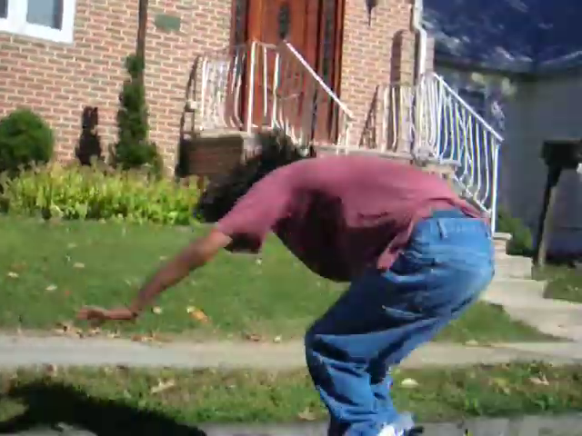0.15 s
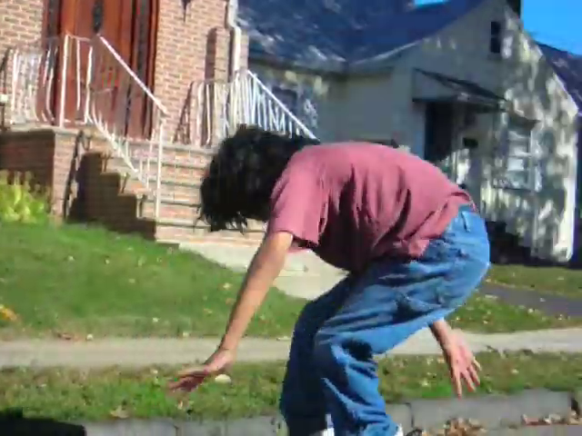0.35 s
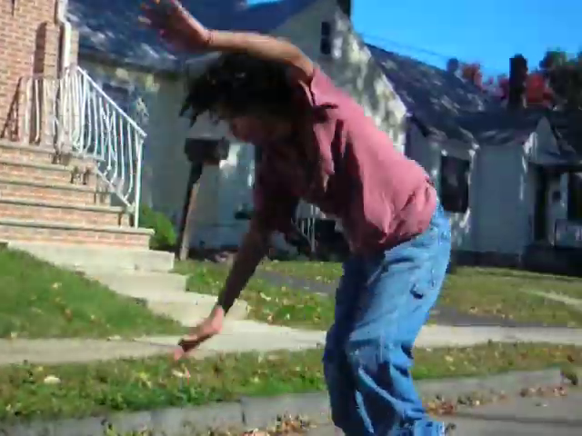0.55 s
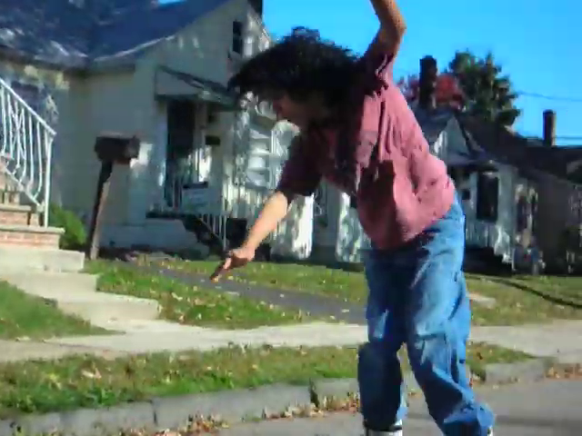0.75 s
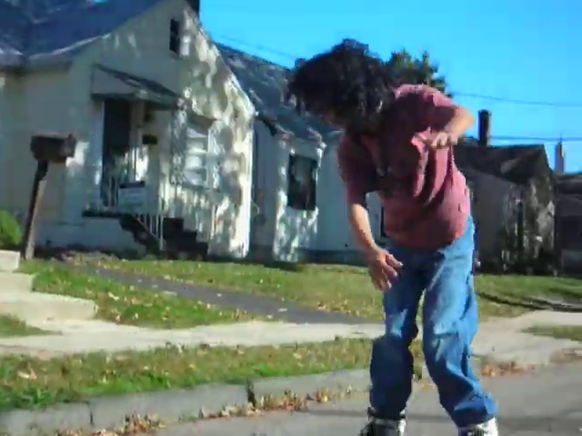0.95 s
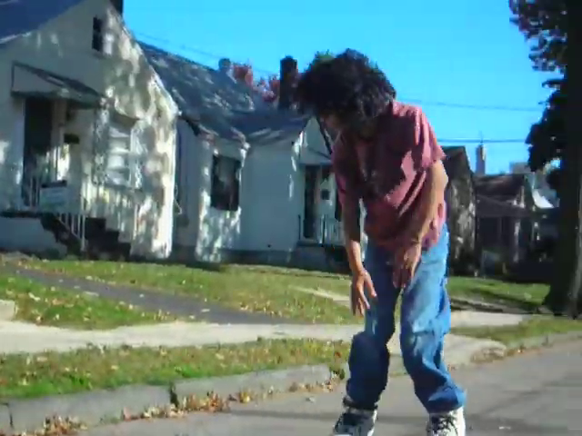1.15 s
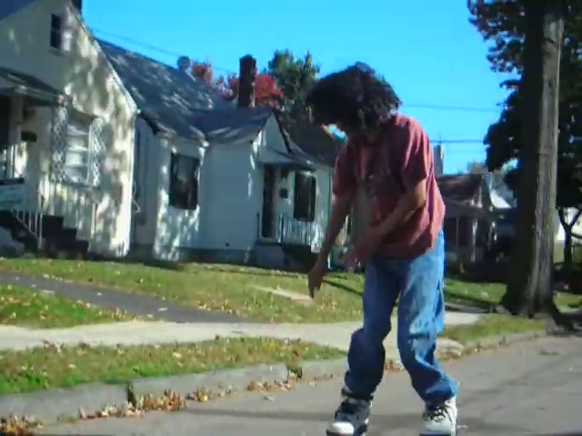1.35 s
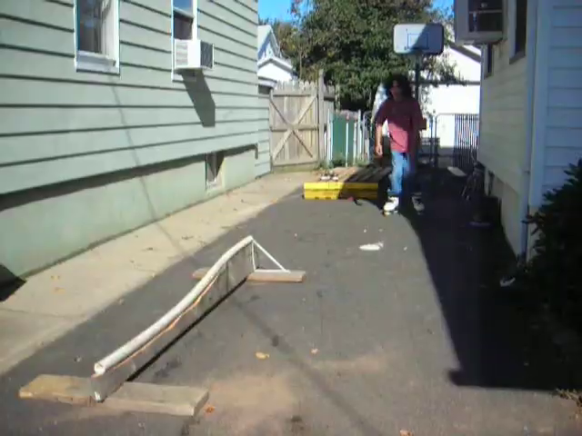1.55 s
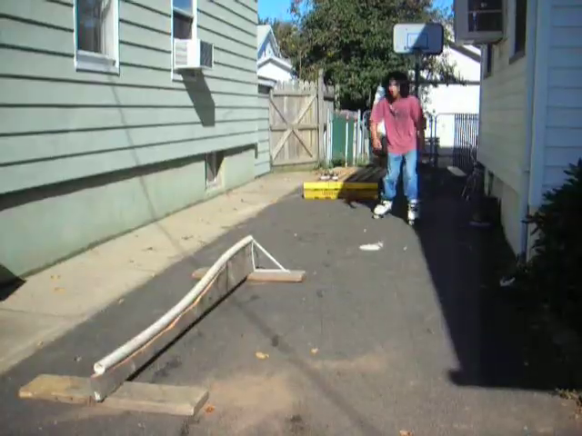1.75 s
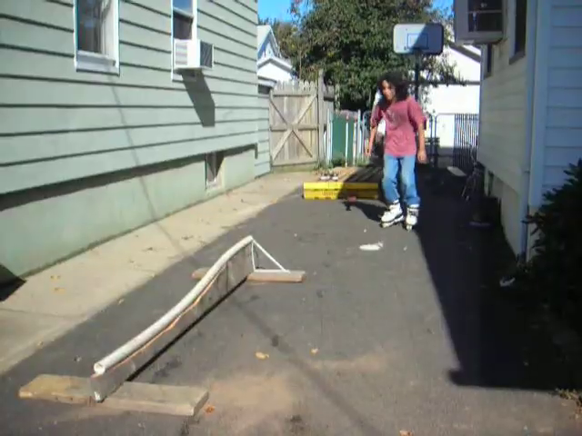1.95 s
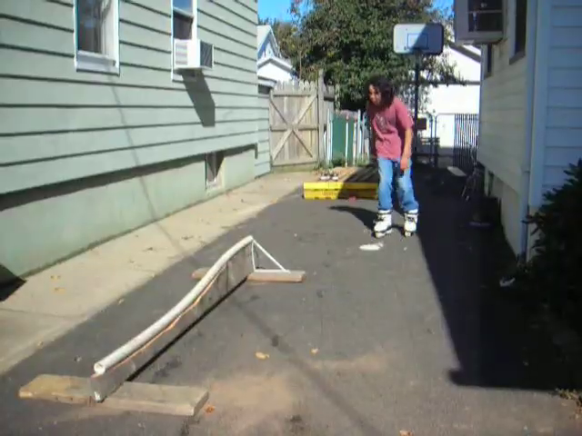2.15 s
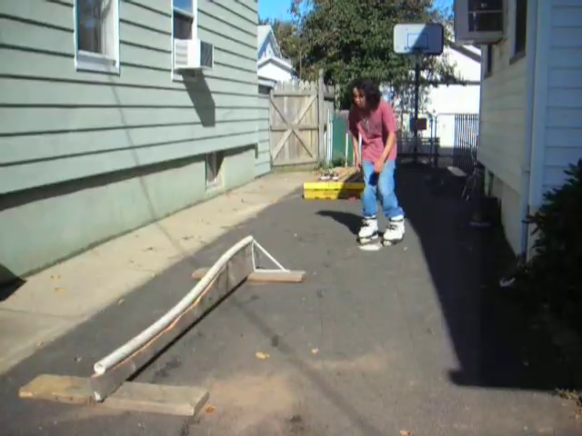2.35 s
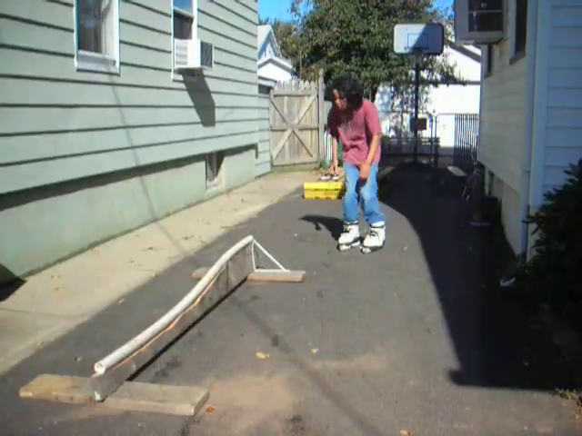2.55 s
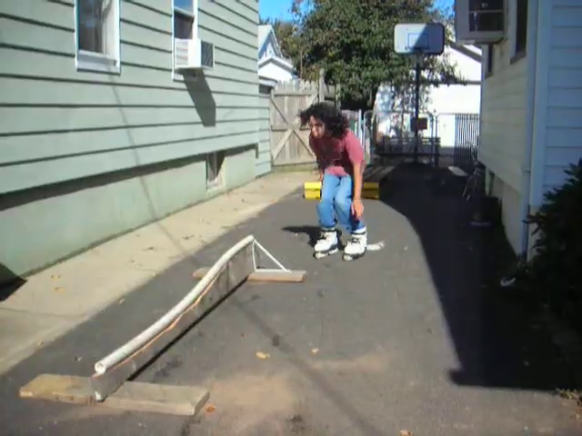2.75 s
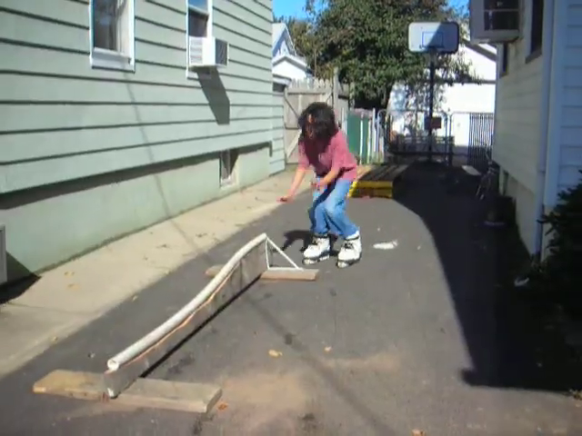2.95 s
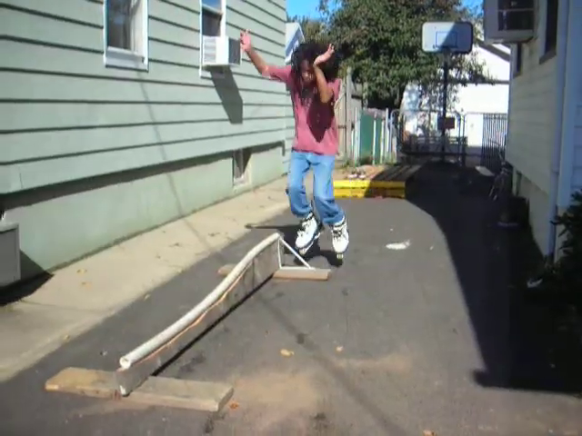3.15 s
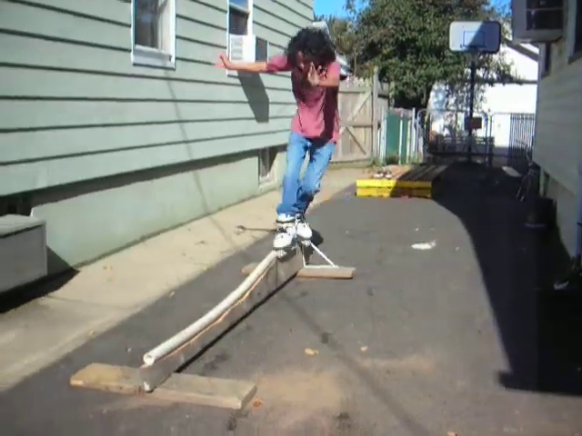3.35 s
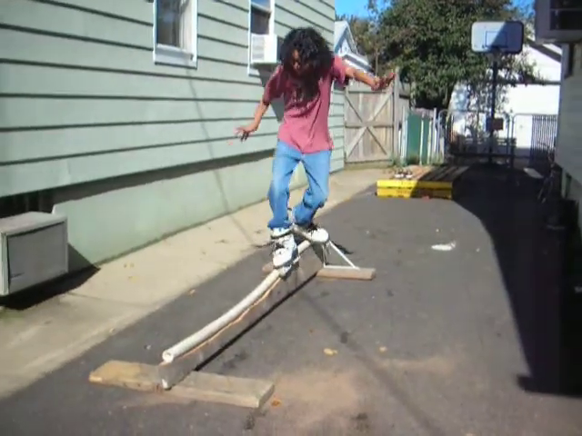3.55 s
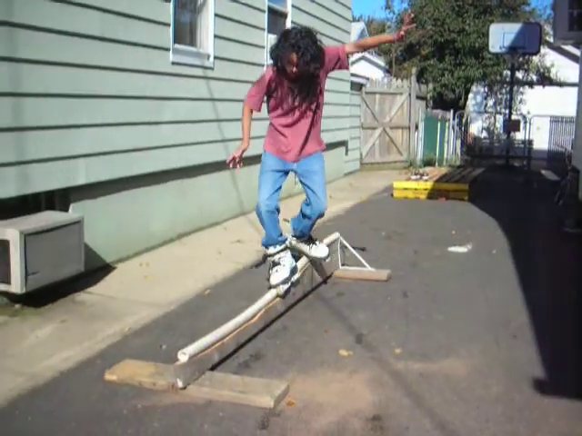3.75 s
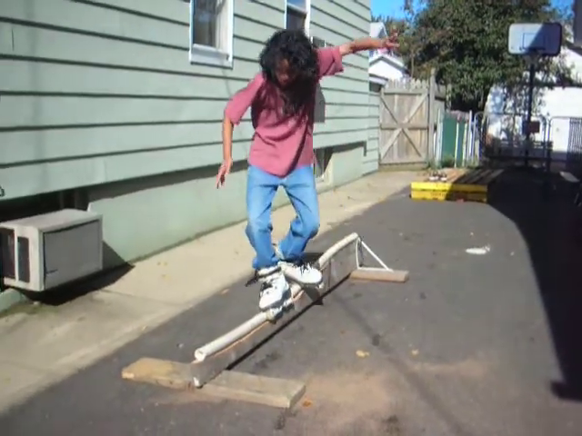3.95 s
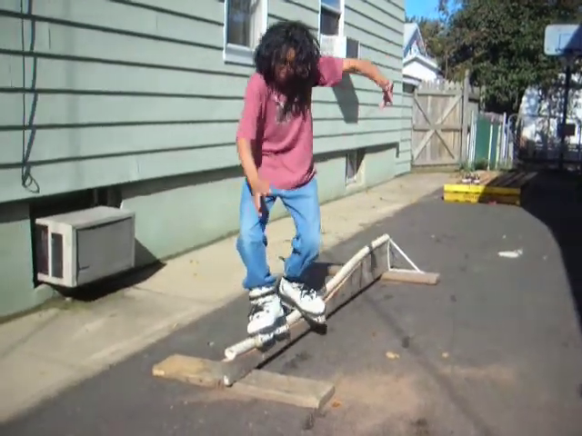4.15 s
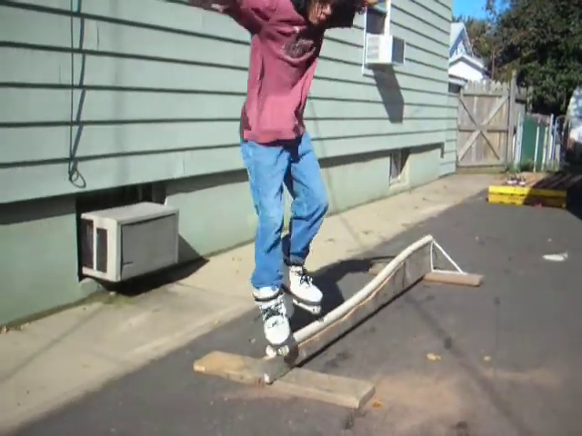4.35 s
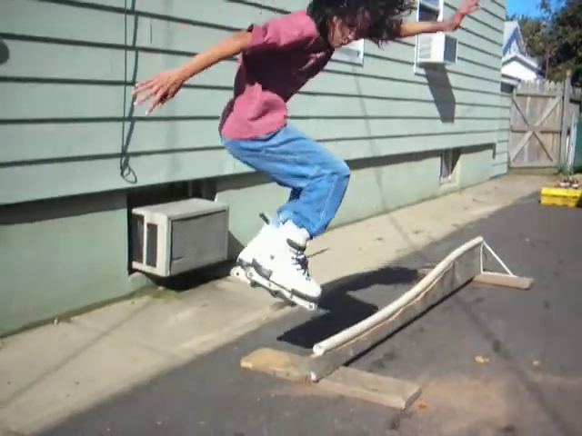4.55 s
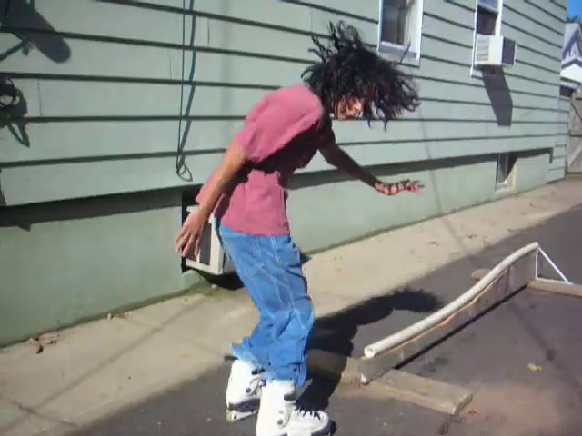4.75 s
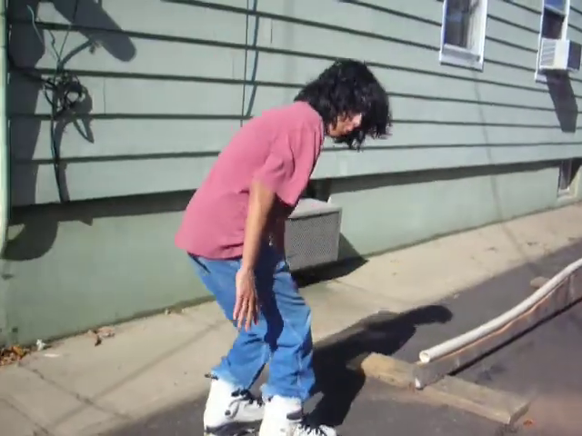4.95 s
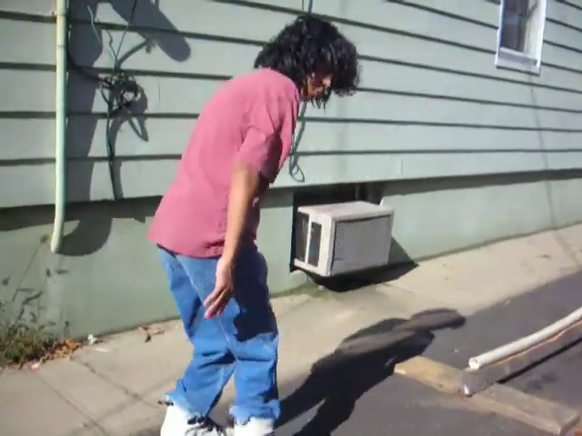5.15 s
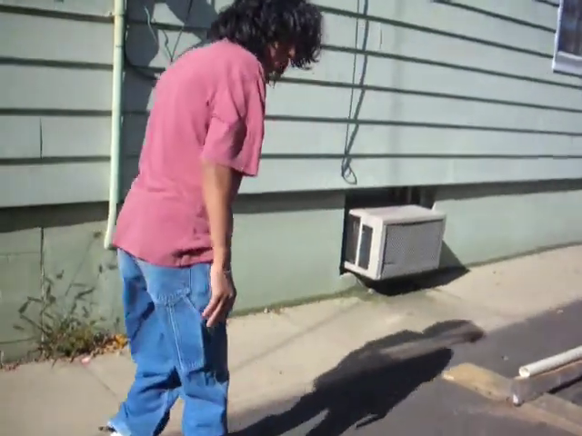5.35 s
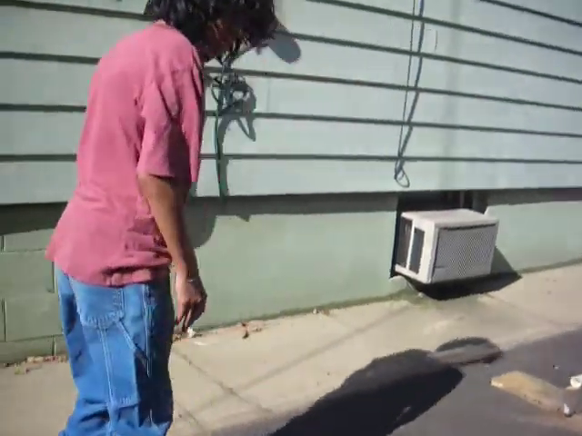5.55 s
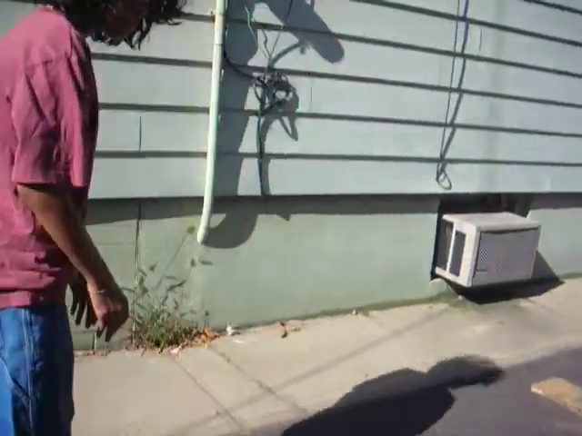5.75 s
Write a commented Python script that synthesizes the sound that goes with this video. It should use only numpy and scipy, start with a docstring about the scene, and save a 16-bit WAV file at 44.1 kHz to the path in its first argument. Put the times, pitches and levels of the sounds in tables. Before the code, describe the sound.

An inline skater lands a jump with a sharp clack and rolls along a street, hard wheels rasping on grit. The rolling continues up a driveway between two houses. The skates clatter onto a low rail, plastic soles scrape along it with a few ringing knocks, then slap down and roll loudly near the microphone. The walls add a short echo over a faint neighbourhood hush, and the sound is dull on top.

```python
"""First comes a sharp clack: an inline skater lands a jump and rolls off along a street. The skater
runs up a driveway between two houses, hops onto a low rail, slides down it, lands and rolls close by.
Grit in the asphalt rattles the wheels and boots, plastic soles scrape the rail and make it ring, and
the house walls add a short echo. A faint neighbourhood hush lies underneath. The sound is cut off
above about 4 kHz and clips on the hardest clacks."""
import sys
import numpy as np
from scipy import signal
from scipy.fft import rfft, irfft
from scipy.io import wavfile
from scipy.ndimage import uniform_filter1d

SR = 44100
rng = np.random.default_rng(int(sys.argv[2]) if len(sys.argv) > 2 else 0)


def master_out(mix):
    """Clip the mix to full scale and print it as 16-bit PCM to the path in sys.argv[1]."""
    frames = np.transpose(np.atleast_2d(mix))
    ceiling = np.clip(frames, -1, 1)
    pcm = np.round(ceiling * 32767).astype(np.int16)
    wavfile.write(sys.argv[1], SR, pcm)


N = 259749
TIME = np.arange(N) / SR
HIT_SIZE = 8192  # samples in one short sound or filter

# How loud each stretch is, set by speed, weight on the skates and distance.
# Each row: time in seconds, level in dB.
STREET_LEVELS = [(0.02, -41.5), (0.12, -29), (0.175, -37.5), (0.33, -35.5), (0.38, -30), (0.46, -28.5),
                 (0.54, -17), (0.74, -18), (1.07, -18.5)]
COAST_LEVELS = [(1.09, -32.5), (1.18, -33), (1.23, -27), (1.45, -21.5), (1.56, -28.5), (1.74, -28.5)]
RUN_UP_LEVELS = [(1.75, -21), (2.0, -30.5), (2.11, -28.5), (2.13, -21.5), (2.65, -22.5), (2.87, -20),
                 (3.07, -26), (3.16, -37.5), (3.3, -39.5)]
SLIDE_LEVELS = [(3.40, -25.5), (3.54, -39), (3.73, -41.5), (3.92, -34.5), (4.08, -27), (4.28, -30),
                (4.34, -22), (4.52, -35.5), (4.66, -48.5)]
ROLL_OUT_LEVELS = [(4.78, -26.5), (4.84, -40.5), (4.92, -40), (5.192, -29.5), (5.204, -23.5), (5.32, -23.5),
                   (5.52, -16), (5.64, -18), (5.85, -14.5)]
# The tone of each stretch and of the background air. Each row: frequency in Hz, gain in dB.
STREET_TONE = [(29, -59.5), (50, -35.5), (198, -3.5), (338, -5.5), (371, -3.5), (705, -8), (895, -8.5),
               (1020, -3.5), (1320, -4), (1640, -2), (3240, -5.5), (4040, -23.5), (5250, -57), (8890, -120)]
COAST_TONE = [(29, -53), (50, -26), (70, -24.5), (184, -12), (406, -10.5), (879, -16.5), (1200, -11),
              (1420, -17.5), (1670, -6), (1900, -12), (2900, -14.5), (3240, -11), (4040, -35.5),
              (5250, -57), (8890, -120)]
RUN_UP_TONE = [(29, -69.5), (50, -31), (188, 1), (238, -9), (326, 0.5), (399, -12), (555, -4.5),
               (929, -7.5), (1160, -2), (1470, -5.5), (1700, -1.5), (1940, -2.5), (2290, -3), (3300, -8.5),
               (4040, -24), (5250, -51.5), (8890, -120)]
SLIDE_TONE = [(29, -84), (50, -31), (135, -19), (178, -21), (257, -13), (371, -11.5), (462, -23),
              (488, -15.5), (802, -0.5), (1080, -8.5), (1220, -5.5), (2700, -7.5), (4040, -21),
              (5250, -83.5), (8890, -120)]
ROLL_OUT_TONE = [(29, -59.5), (50, -36), (108, -12.5), (222, -2), (257, -4.5), (344, 0.5), (406, -8.5),
                 (525, -13), (787, -2), (1120, -4.5), (1290, -2), (1700, -2), (3240, -6.5), (4040, -21.5),
                 (5250, -65), (8890, -120)]
AIR_TONE = [(24, -31.5), (40, -16.5), (70, -33), (322, -28.5), (398, -26.5), (931, -9.5), (3330, -36.5),
            (4040, -48), (5250, -75.5), (8890, -120)]
# The pitches at which things ring. Each row: pitch in Hz, width in Hz, gain in dB.
SKATE_RINGS = [(297, 190, -4.5), (480, 170, -8), (690, 280, -3), (1240, 260, -2), (1644, 74, 0.5),
               (2290, 130, -2), (2700, 54, -10.5), (3350, 780, -3.5)]  # wheels, frame and boot
HUB_RINGS = [(1700, 170, -6)]  # the hollow wheel hubs
RAIL_RINGS = [(330, 43, -1.5), (680, 61, -1), (760, 420, 7), (910, 67, 0.5), (1190, 95, -1),
              (1600, 530, -0.5), (2200, 320, -2.5), (2650, 430, 3.5), (3250, 360, 6)]  # the rail on its wooden feet
# A skate slaps the ground. Each row: start in seconds, level in dB, second slap compared with
# the first in dB, pitch of the struck spot in Hz.
LANDINGS = [(.0420, -10, -2.5, 1940), (0.0572, -14.5, -12.5, 450), (4.74, -11.5, -2, 1560),
            (4.7515, -15, -4.5, 696)]
# A boot strikes the rail. Each row: start in seconds, frame level in dB, sole level in dB,
# delay of the sole in seconds, fade time of the frame's rattle in seconds, pitch of the sole in Hz.
RAIL_HITS = [(3.321, -9, -12, 0.00096, 0.0085, 1120), (3.3320, -19, -14.5, .001, 0.017, 720),
             (3.3617, -11.5, -14.5, 0.013, 0.015, 694), (3.4060, -15, -20, .001, 0.0061, 760),
             (4.0280, -29.5, -34, .002, 0.018, 800), (4.0745, -24.5, -15, 0.00084, 0.012, 796),
             (4.1637, -25, -27, 0.00094, 0.011, 784), (4.3016, -12, -13.5, 0.0073, 0.0089, 850),
             (4.4991, -20.5, -19, 0.00099, 0.0045, 1380)]
# Short knocks, and two soft low swells in the rolling rumble (at 2.226 and 2.386 seconds).
# Each row: start in seconds, level in dB, pitch in Hz, fade in seconds.
KNOCKS_AND_SWELLS = [(0.0424, -10.5, 456, 0.0025), (0.981, -22, 109, 0.0063), (1.0785, -8, 3200, 0.0007),
                     (1.2539, -9, 206, 0.0024), (1.6506, -3, 452, 0.0017), (2.226, -23.5, 192, 0.022),
                     (2.386, -24, 195, 0.028), (4.5007, 4.5, 808, 0.0016), (4.7386, -3.5, 1526, 0.0013)]
# Wheels touch down and rattle. Each row: start in seconds, level in dB, pitch in Hz, fade in seconds.
WHEEL_CLICKS = [(.3618, -31, 2200, 0.0032), (0.391, -28, 2700, 0.0027), (.4115, -33, 2400, .002),
                (0.4646, -29, 2500, .004), (0.541, -16, 2000, 0.0072), (.8767, -17, 2510, 0.0011),
                (1.075, -15.5, 3200, 0.0021), (1.3027, -33, 1700, .0044), (1.4953, -23, 1700, 0.0051),
                (1.5211, -16.5, 3250, 0.003), (1.6502, -19.5, 2300, 0.0067), (1.747, -22.5, 2400, 0.0062),
                (1.9477, -24.5, 1990, 0.0069), (2.046, -27, 2300, 0.0054), (2.1178, -30, 2300, 0.0087),
                (4.9355, -35, 2505, .005), (5.0185, -32, 2400, 0.0065), (5.1969, -22.5, 2500, 0.0069),
                (5.44, -21, 2010, 0.0067)]


def undb(db):
    """Turn decibels into a number to multiply by."""
    return 10 ** (np.asarray(db) / 20)


def unit(x):
    """Scale a signal so that its average strength (rms) is 1."""
    return x / np.sqrt(np.mean(x ** 2) + 1e-18)


def add(out, start_s, x):
    """Mix a short sound in at its start time."""
    i = max(int(start_s * SR), 0)
    out[i:i + len(x)] += x[:N - i]


def at_level(x, db):
    """Give a hit the energy of a sound held at db for 10 ms."""
    return x * undb(db) / np.sqrt(np.sum(x ** 2) / (SR / 100))


def butter(x, hz, kind, order=2):
    """Keep the lows, the highs or a band in between."""
    return signal.sosfilt(signal.butter(order, hz, kind, fs=SR, output="sos"), x)


def below(x, hz):
    """Keep the part of a sound under hz, without delaying it."""
    return signal.sosfiltfilt(signal.butter(4, hz, fs=SR, output="sos"), x)


def ring(x, rings):
    """Shake an object so that it rings briefly at each of its pitches."""
    return sum(undb(db) * signal.lfilter(*signal.iirpeak(hz, hz / width, fs=SR), x)
               for hz, width, db in rings)


def shape_tone(x, tone):
    """Filter a sound to follow a tone table, keeping the start of each tick sharp."""
    hz, db = np.transpose(tone)
    grid_hz = np.maximum(np.arange(HIT_SIZE // 2 + 1) * SR / HIT_SIZE, 1)
    gains = undb(np.interp(np.log(grid_hz), np.log(hz), db))
    cepstrum = irfft(np.log(gains))
    cepstrum[1:HIT_SIZE // 2] *= 2  # fold it so that nothing sounds ahead of a tick
    cepstrum[HIT_SIZE // 2 + 1:] = 0
    response = irfft(np.exp(rfft(cepstrum)))
    return signal.fftconvolve(x, response)[:N]


def drift(per_s):
    """Wander smoothly between random values, about 1 in size."""
    points = rng.standard_normal(HIT_SIZE)
    return unit(np.interp(TIME * per_s, np.arange(HIT_SIZE), points))


def air():
    """The neighbourhood makes a faint hush that gently rises and falls."""
    hush = unit(shape_tone(rng.standard_normal(N), AIR_TONE))
    return hush * undb(-47.5 + drift(per_s=3.2))


def house_echo(x, from_s, fade_s, level_db):
    """From from_s on, sound bounces between the two houses, dying by 60 dB in fade_s."""
    t = TIME[:SR]
    echoes = rng.standard_normal(SR) * undb(-60 * t / fade_s) * (t > .008)
    echoes /= np.sqrt(np.sum(echoes ** 2))
    return undb(level_db) * signal.fftconvolve(x * (TIME > from_s), echoes)[:N]


def blow(fade_s, rattle_db):
    """One push, then the dying chatter of wheels and buckles knocking between their stops."""
    t = TIME[:HIT_SIZE]
    noise = unit(butter(rng.standard_normal(HIT_SIZE), 4000, "low", order=4))
    chatter = np.tanh(2 * noise) * np.exp(-t / fade_s)
    push = butter(1. * (t == 0), 4000, "low", order=4)
    return unit(push) + undb(rattle_db) * unit(chatter)


def clicks(rows):
    """Wheels give short, bright rattles in their frame."""
    out = np.zeros(N)
    for start_s, db, hz, fade_s in rows:
        push = blow(fade_s, rattle_db=12)
        body = ring(push, [(hz, 1100, 0)]) + undb(-8) * ring(push, SKATE_RINGS)
        add(out, start_s, at_level(butter(body, 3450, "low", order=8), db))
    return out


def stones(per_s=7, pitch_hz=2330, fade_s=0.0028):
    """Loose stones tick under the wheels at random, louder when the rolling is louder."""
    when, size, pitch = rng.random((int(per_s * N / SR), 3)).T
    start_s = when * N / SR
    rolling = STREET_LEVELS + COAST_LEVELS + RUN_UP_LEVELS + ROLL_OUT_LEVELS
    rolling_db = np.interp(start_s, *np.transpose(rolling))
    tick_db = rolling_db - 4 + 1.5 * (2 * size - 1)
    tick_hz = pitch_hz * 2 ** ((pitch - .5) / 2)
    rows = np.column_stack([start_s, tick_db, tick_hz, np.full(len(start_s), fade_s)])
    on_ground = (start_s < 3.1) | (start_s > 4.8)
    return clicks(rows[on_ground])


def knocks_and_swells():
    """Brief tones rise and die away: the quick ones are knocks, the two slow ones soft low swells."""
    out, t = np.zeros(N), TIME[:HIT_SIZE]
    for start_s, db, hz, fade_s in KNOCKS_AND_SWELLS:
        age = 2 * t / fade_s
        swing = age * np.exp(1 - age) * np.sin(2 * np.pi * hz * t)
        add(out, start_s, undb(db) * butter(swing, 0.31 * hz, "high"))
    return out


def clack(db, rings, fade_s, crack_db, bright_hz, rattle_db):
    """A blow cracks and makes an object ring; softer contact (lower bright_hz) sounds duller."""
    push = blow(fade_s, rattle_db)
    body = ring(push, rings) + undb(crack_db) * push
    heard = butter(body, [135, 3700], "band", order=4)
    return at_level(butter(heard, bright_hz, "low"), db)


def landings():
    """Each skate slaps down twice, quickly: one end of the wheel row and then the other."""
    out = np.zeros(N)
    slap = dict(crack_db=-5, bright_hz=2380, rattle_db=2.5)
    for start_s, db, second_db, spot_hz in LANDINGS:
        first = SKATE_RINGS + [(spot_hz, 150, 6)]  # the struck spot adds its own ring
        second = SKATE_RINGS + [(1570, 150, 6)]
        add(out, start_s, clack(db, first, fade_s=0.0048, **slap))
        add(out, start_s + 0.0049, clack(db + second_db, second, fade_s=0.009, **slap))
    return out


def rail_hits():
    """The hard frame cracks against the rail; the sole follows with a duller, longer clatter."""
    out = np.zeros(N)
    for start_s, frame_db, sole_db, delay_s, fade_s, sole_hz in RAIL_HITS:
        frame_rings = RAIL_RINGS + [(2300, 370, 6.5)]
        sole_rings = RAIL_RINGS + [(sole_hz, 370, 6.5)]
        frame = clack(frame_db, frame_rings, fade_s, crack_db=-19, bright_hz=3700, rattle_db=15.5)
        sole = clack(sole_db, sole_rings, 1.76 * fade_s, crack_db=-19, bright_hz=2400, rattle_db=19.5)
        add(out, start_s, frame)
        add(out, start_s + delay_s, sole)
    return out


def grit(per_s, spread_db, patchy_db, hiss_db):
    """Tiny bumps strike the skate at random, a few much harder, in rough and smooth patches."""
    struck = rng.random(N) < per_s / SR
    size = undb(spread_db * np.minimum(rng.exponential(size=N), 4))
    strikes = unit(struck * size * rng.choice([-1, 1], N))
    hiss = undb(hiss_db) * rng.standard_normal(N)
    return (strikes + hiss) * undb(patchy_db * drift(per_s=130))


def asphalt(per_s, spread_db, patchy_db, hiss_db):
    """Grit strikes the wheels and makes their hollow hubs ring."""
    strikes = grit(per_s, spread_db, patchy_db, hiss_db)
    return strikes + ring(strikes, HUB_RINGS)


def travel(contact, rings, levels, tone, start_s, end_s, ring_db, bright_db, rumble_db):
    """A surface shakes a ringing object: the rasp brightens as it gets louder, the rumble grows less."""
    sway_db = 1.04 * drift(per_s=20)  # weight shifts from wheel to wheel
    level_db = np.interp(TIME, *np.transpose(levels)) + sway_db
    load_db = level_db + 25  # how far above easy rolling, which is -25 dB
    treble_gain = undb(bright_db + 0.1455 * load_db)
    rumble_gain = undb(rumble_db - 0.1156 * load_db)
    sound = shape_tone(contact + undb(ring_db) * ring(contact, rings), tone)
    bass, dull = below(sound, 550), below(sound, 2100)
    middle, treble = unit(dull - bass), unit(sound - dull)
    rasp = (middle + treble_gain * treble) / np.hypot(1, treble_gain)
    touching = uniform_filter1d(1. * ((TIME >= start_s) & (TIME < end_s)), size=200)
    return touching * undb(level_db) * (unit(rasp) + rumble_gain * unit(bass))


def slide():
    """Plastic soles scrape along the rail and set it ringing."""
    scrape = grit(per_s=2000, spread_db=2.6, patchy_db=1.4, hiss_db=-4)
    return travel(scrape, RAIL_RINGS, SLIDE_LEVELS, SLIDE_TONE,
                  start_s=3.325, end_s=4.76, ring_db=-9, bright_db=-1.5, rumble_db=-11)


def wheels():
    """Hard wheels roll on the street, then on the driveway before and after the rail."""
    ground = asphalt(per_s=1500, spread_db=3.4, patchy_db=1.3, hiss_db=-7.5)
    street = travel(ground, SKATE_RINGS, STREET_LEVELS, STREET_TONE,
                    start_s=0, end_s=1.08, ring_db=-15, bright_db=-4, rumble_db=-9.5)
    ground = asphalt(per_s=1500, spread_db=4.3, patchy_db=1.3, hiss_db=-6.5)
    coast = travel(ground, SKATE_RINGS, COAST_LEVELS, COAST_TONE,
                   start_s=1.08, end_s=1.745, ring_db=-17, bright_db=-3, rumble_db=-11)
    ground = asphalt(per_s=2500, spread_db=4, patchy_db=1.1, hiss_db=-1)
    run_up = travel(ground, SKATE_RINGS, RUN_UP_LEVELS, RUN_UP_TONE,
                    start_s=1.745, end_s=3.325, ring_db=-8, bright_db=-2, rumble_db=-10)
    ground = asphalt(per_s=2400, spread_db=4.4, patchy_db=1.5, hiss_db=-4.5)
    roll_out = travel(ground, SKATE_RINGS, ROLL_OUT_LEVELS, ROLL_OUT_TONE,
                      start_s=4.76, end_s=6, ring_db=-15.5, bright_db=-6, rumble_db=-11)
    ceiling = undb(-4.5)  # a soft limit rounds off the loudest peaks of the rolling
    return ceiling * np.tanh((street + coast + run_up + roll_out) / ceiling)


def scene():
    """Mix the skater's sounds, their echo and the background air into one channel."""
    blows = landings() + rail_hits()
    skater = wheels() + slide() + blows + knocks_and_swells() + clicks(WHEEL_CLICKS) + stones()
    echo = house_echo(skater, from_s=1.7, fade_s=0.26, level_db=-14.5)
    return (skater + echo + air())[None]


def record(dry):
    """The sound is cut off above about 4 kHz, sits slightly off zero and clips on the hardest clacks."""
    band_hz, top_hz = 4150, 16000
    offset, limit = -.03, .71
    narrow = signal.sosfilt(signal.ellip(8, .3, 80, band_hz, fs=SR, output="sos"), dry)
    clipped = np.clip(narrow + offset, -limit, limit)
    return signal.sosfilt(signal.ellip(8, .2, 70, top_hz, fs=SR, output="sos"), clipped)


dry = scene()
out = record(dry)
master_out(out)
```